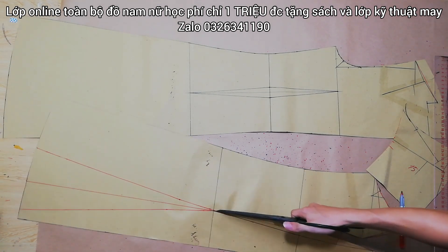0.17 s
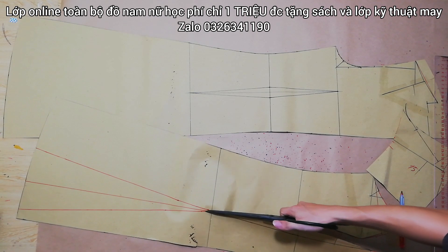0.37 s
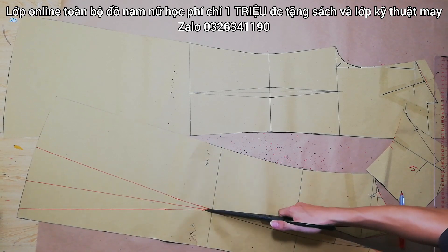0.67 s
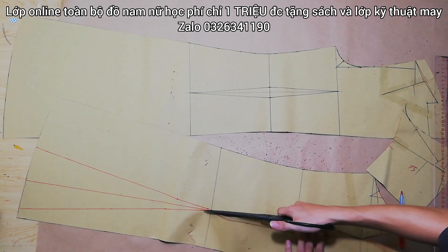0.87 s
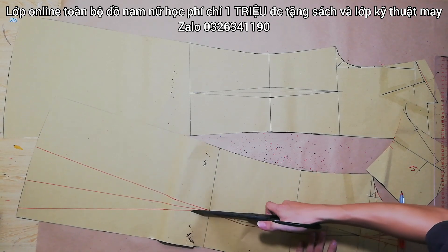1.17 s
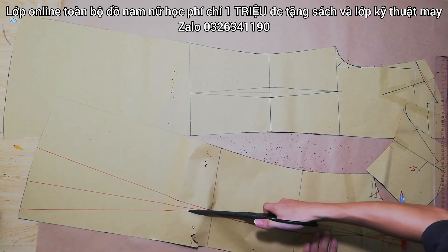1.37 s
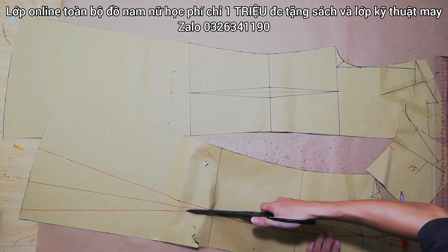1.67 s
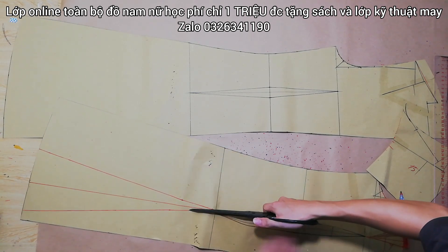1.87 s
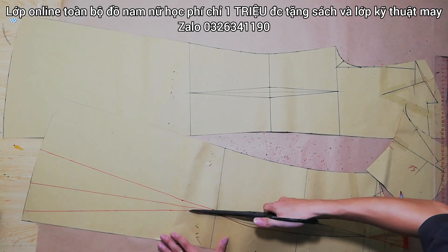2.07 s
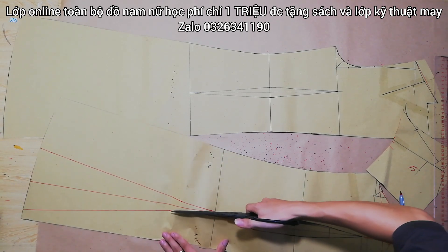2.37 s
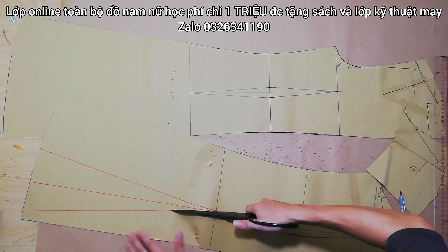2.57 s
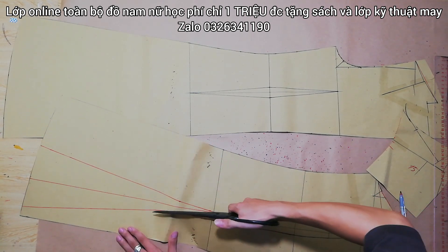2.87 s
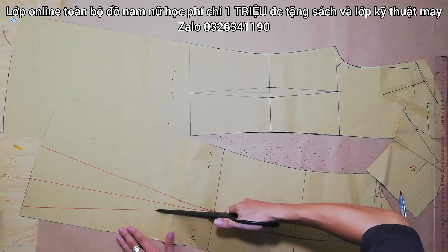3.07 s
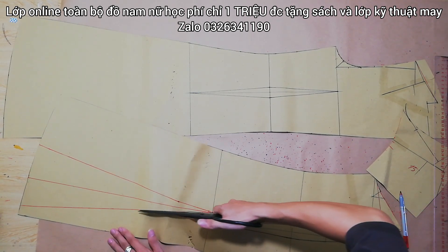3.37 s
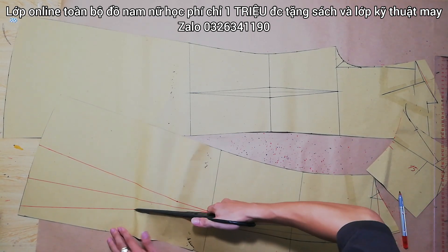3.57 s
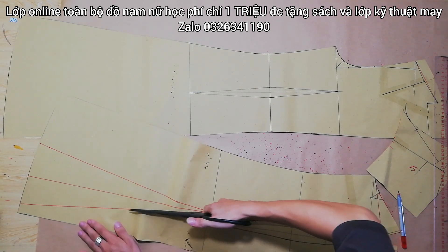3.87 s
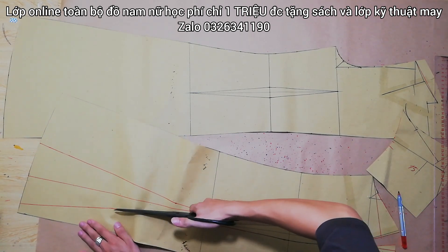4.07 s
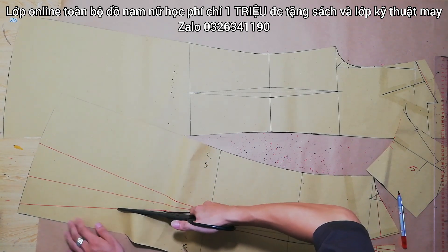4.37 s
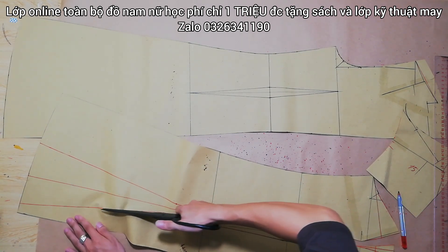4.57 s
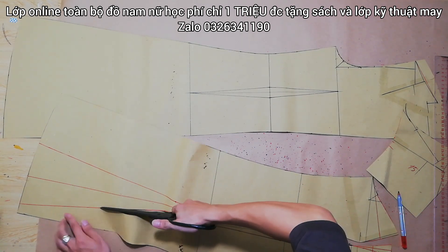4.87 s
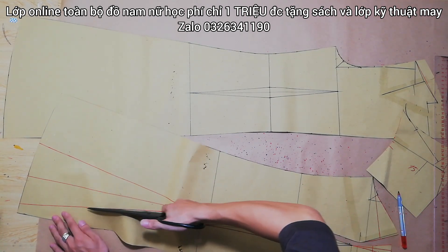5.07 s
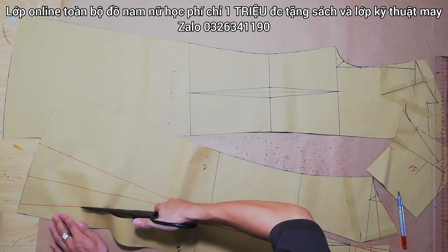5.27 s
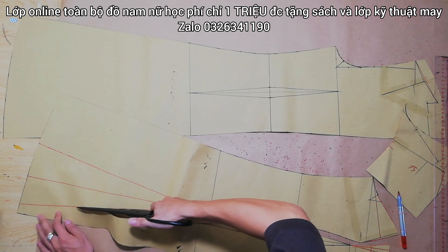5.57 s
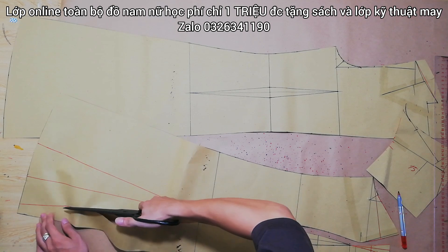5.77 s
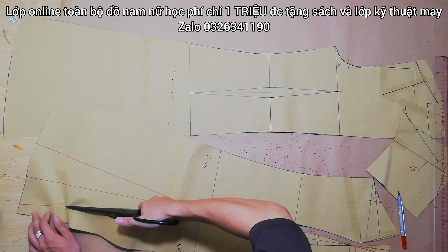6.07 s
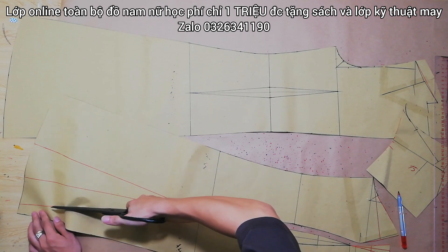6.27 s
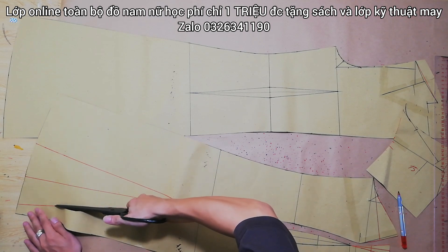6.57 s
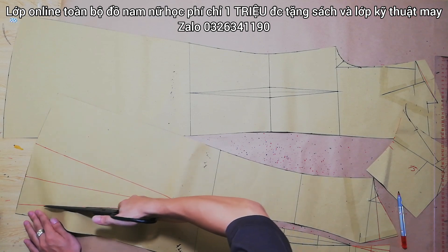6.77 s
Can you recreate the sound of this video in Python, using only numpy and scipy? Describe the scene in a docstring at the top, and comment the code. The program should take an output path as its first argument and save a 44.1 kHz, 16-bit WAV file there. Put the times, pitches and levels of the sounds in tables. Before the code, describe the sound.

Close, wide stereo in a bare room with a short echo and a low murmur. From 0 s the open shears hiss lightly along stiff paper, with small ticks and faint low tones. The first crunch comes at 0.6 s, dense with tiny fibre cracks over a woody table judder. Around 0.9-1.1 s the blades scrape strongly and the sheet rasps, ending in a very loud dry snap at 1.07 s, then a fading slide and a soft low tone near 1.45 s. Further crunches fall at 1.7, 2.5, 3.05, 3.6, 4.2, 4.8, 5.35, 5.9 and 6.5 s, each about a tenth of a second. Between them steel wipes open, friction hisses swell, paper snaps, and the hand drags and bumps softly on the table. Blade taps mark 5.03, 5.35 and 6.49 s; the last cut is weaker with more steel ring, then a faint slide to the end.

```python
"""Shears cutting stiff paper

Large tailor's shears make ten cuts through stiff pattern paper on a wooden work table, in a bare room.
Each cut is a short crunch of tiny random fibre cracks; the lower blade judders on the ringing table top.
Between cuts the shears open and slide on: noisy friction hisses along the sheet and makes it resonate.
Sharp pulses make paper snaps and blade ticks; soft drags, bumps, low tones and room murmur lie below."""
import sys
import numpy as np
from scipy import signal
from scipy.fft import rfft, irfft, next_fast_len
from scipy.io import wavfile
from scipy.ndimage import map_coordinates

SR = 44100
rng = np.random.default_rng(int(sys.argv[2]) if len(sys.argv) > 2 else 0)


def master(y):
    """Save y as 16-bit WAV."""
    cut = np.clip(np.atleast_2d(y).T, -1, 1)
    pcm = np.round(cut * 32767)  # scale
    wavfile.write(sys.argv[1], SR, pcm.astype(np.int16))


N = 305613
TIME = np.arange(N) / SR  # s

# the ten cuts, with the strength of each part before its layer is trimmed and shaped:
# start t/s, hardest bite t/s, blades shut t/s, crunch level/dB, fibre fizz level/dB,
# change of level when shut/dB, table knock level/dB, table boom level/dB, deep thud level/dB,
# blade ring level/dB, drag after the cut level/dB
CUTS = [(0.578, 0.595, 0.67, -35.5, -35.5, -8, -38.5, -42.5, -44.5, -50, -57),
        (1.71, 1.738, 1.8, -30, -34.5, -14.5, -39.5, -38, -47.5, -61, -75),
        (2.496, 2.532, 2.593, -32, -37, -13, -39.5, -43, -44.5, -54, -51),
        (3.052, 3.075, 3.166, -30.5, -34, -16, -41, -41.5, -41.5, -55, -50),
        (3.623, 3.65, 3.75, -32.5, -35.5, -10.5, -39.5, -40, -49.5, -54, -55),
        (4.217, 4.25, 4.322, -34.5, -35.5, -7, -37, -40, -43, -60, -53),
        (4.81, 4.819, 4.905, -32.5, -32, -11.5, -40, -40.5, -46.5, -47, -53),
        (5.341, 5.377, 5.455, -35.5, -36.5, -13, -38.5, -35.5, -43, -44, -54.5),
        (5.911, 5.932, 6.03, -34, -33.5, -8, -40.5, -39, -53, -49, -64),
        (6.506, 6.518, 6.58, -41.5, -42, -4, -37.5, -38, -51, -39.5, -67)]
# ways the table top rings: f/Hz, width f/Hz, relative level/dB
TABLE_MODES = [(88.2, 13.6, 4), (131.6, 32, -3), (145.7, 29, -0.5), (221.4, 12.4, 3), (237, 22, -4.5),
               (286.6, 11, -0.5), (329.6, 23, -4), (405.6, 23.6, -3), (468.6, 29, -2), (538, 19.4, -3),
               (599, 24, -2), (746.7, 31, -1), (784, 56, -1), (879, 45, -2.5), (1022, 43, -8.5),
               (1140, 51, -11), (1240, 53, -18), (1477, 51, -14.5)]
# tone colour of snaps and snagging fibres: f/Hz, relative level/dB per Hz
SNAP_COLOUR = [(300, -25), (900, -12), (1600, -8.5), (3000, -4.5), (5000, -1), (7500, -0.5), (11500, -6.5),
               (14000, -27), (16000, -15)]


def amp(db):
    """Turn decibels into a plain gain."""
    return 10 ** (np.asarray(db) / 20)


def unit(x):
    """Scale to an rms (average strength) of 1."""
    return x / np.sqrt(np.mean(x ** 2) + 1e-20)


def along(points, hz):
    """Read a curve of (f/Hz, value) points, spaced by musical interval."""
    f, value = np.transpose(points)
    return np.interp(np.log(hz + 1), np.log(f), value)


def wobble(rate):
    """A smooth random curve with this many knots a second."""
    coarse = TIME[::32]
    knots = rng.standard_normal(N // 64)
    return np.interp(TIME, coarse, map_coordinates(knots, [coarse * rate], mode="wrap"))


def filtered(x, response):
    """Change the strength and phase of each frequency in x by the given response."""
    m = next_fast_len(N + SR)
    return irfft(rfft(x, m) * response(np.fft.rfftfreq(m, 1 / SR)), m)[..., :N]


def colour(points):
    """A filter that follows (f/Hz, level/dB) points, never sounds early and has power 1."""
    def response(hz):
        cepstrum = irfft(np.log(unit(amp(along(points, hz)))))
        half = len(cepstrum) // 2
        # folding the cepstrum onto its first half puts the response after its cause
        folded = np.r_[cepstrum[0], 2 * cepstrum[1:half], np.zeros(half)]
        return np.exp(rfft(folded))
    return response


def spread(pair):
    """Mix two unrelated signals into left and right: alike in the bass, nearly unrelated in the top treble."""
    # likeness of the two sides (1 same, 0 unrelated, -1 opposite): f/Hz, likeness
    likeness = [(100, 0.98), (200, 0.44), (330, 0.42), (650, -0.4), (1300, 0.54), (2500, -0.072),
                (12000, -0.0076)]

    def shares(hz):
        turn = np.arccos(np.clip(along(likeness, hz), -1, 1)) / 2
        return np.array([np.cos(turn), np.sin(turn)])
    mid, side = filtered(pair, shares)
    return np.array([mid + side, mid - side])


def crackle(rate, scatter_db):
    """Tiny slips at random times, about rate a second, of uneven size; rms 1."""
    hit = rng.random(N) < rate / SR
    size, sign = rng.standard_normal((N // 2, 2))[:hit.sum()].T
    slips = np.zeros(N)
    slips[hit] = amp(scatter_db * np.clip(size, -2, 2)) * np.sign(sign)
    return unit(slips)


def wide_crackle(rate, scatter_db):
    """Two unrelated crackles, for a large surface that radiates from many places."""
    return np.array([crackle(rate, scatter_db), crackle(rate, scatter_db)])


def stroke(times, levels_db):
    """Gain that runs through (t/s, level/dB) corners and is silent outside them."""
    times = np.maximum.accumulate(times)
    inside = slice(*np.searchsorted(TIME, [times[0], times[-1]]))
    gain = np.zeros(N)
    gain[inside] = amp(np.interp(TIME[inside], times, levels_db))
    return gain


def ringing(modes, hz):
    """Add resonances of (f/Hz, width f/Hz, level/dB) that ring only after they are driven."""
    total = 0
    for k, (centre, width, db) in enumerate(modes):
        damping = 1j * hz * width
        resonance = damping / (centre * centre - hz * hz + damping)
        total = total + amp(db) * resonance * (-1) ** k  # every other mode moves the opposite way
    return total


def struck(force, modes, lo_hz, hi_hz):
    """A body rings under a force; the kind of contact favours its modes between lo_hz and hi_hz."""
    def response(hz):
        low_pass = 1 + (hz / hi_hz) ** 6
        high_pass = 1 + (lo_hz / (hz + 1)) ** 6
        h = ringing(modes, hz) / low_pass / high_pass
        return h / np.sqrt(np.mean(np.abs(h) ** 2))
    return filtered(force, response)


def room(x, near_t60, wet_db, size=8192):
    """A quick scatter off sheet and table, then the walls; the paths change as the shears travel."""
    # time for the walls' echo to fall 60 dB: f/Hz, t/s
    wall_t60 = [(100, 0.47), (400, 0.76), (1000, 0.45), (3000, 0.45), (8000, 0.47), (15000, 0.48)]
    t = np.arange(2 * size) / SR
    norm = lambda h: h / np.linalg.norm(h, axis=-1, keepdims=True)
    hz, age, z = signal.stft(rng.standard_normal((2, len(t))), SR, nperseg=256)
    fade = amp(-60 * age / along(wall_t60, hz)[:, None])
    tail = signal.istft(z * fade, SR, nperseg=256)[1]
    walls = amp(wet_db) * norm(tail * (1 - np.exp(-t / 0.0042)))  # echoes build up over milliseconds
    scatter = amp(-60 * t / near_t60)
    out = np.zeros((2, N + 3 * size))
    for i in range(0, N, size):  # each block of sound gets new random nearby paths
        paths = norm(rng.standard_normal((2, len(t))) * scatter) + walls
        block = np.pad(x, (0, size))[None, i:i + size]
        out[:, i:i + 3 * size - 1] += signal.fftconvolve(block, paths, axes=1)
    return spread(out[:, :N])


def room_tone():
    """The steady low murmur and hiss of the room: random noise with a fixed tone colour."""
    # tone colour of the room: f/Hz, relative level/dB per Hz
    murmur = [(20, -30), (50, 7.5), (95, -19), (140, -18.5), (215, -6.5), (400, -13.5), (700, -17.5),
              (1500, -14), (4000, -16), (11500, -27.5), (16000, -32)]
    noise = rng.standard_normal((2, N))
    return amp(-60) * spread(filtered(noise, colour(murmur)))


def hum():
    """Soft low tones, each a gliding sine with a weak octave, swell, flutter and fade."""
    # the tones: start t/s, loudest t/s, end t/s, pitch when loudest f/Hz, glide/(Hz per s), level/dB
    hums = [(0.0, 0.172, 0.34, 209, -62, -59.5), (0.231, 0.346, 0.43, 186, -69, -49.5),
            (0.388, 0.5, 0.65, 177.5, -59.5, -56), (1.284, 1.448, 1.66, 223, 15.5, -52)]
    swell_db = 16.5
    tone = np.zeros(N)
    for start, loudest, end, hz, glide, db in hums:
        phase = 2 * np.pi * np.cumsum(hz + glide * (TIME - loudest)) / SR
        gain = stroke([start, loudest, end], [db - swell_db, db, db - swell_db])
        tone += gain * (np.sin(phase) + amp(-25.0) * np.sin(2 * phase))
    return tone * amp(1.1 * wobble(24.8))


def handling():
    """Hand and handle drag over the table after each cut and nudge it; the blade tip taps it."""
    # soft bumps of the handle on the table: t/s, level/dB
    bumps = [(0.96, -56), (2.189, -50.5), (2.488, -44), (2.74, -57), (2.869, -56), (3.269, -51),
             (3.369, -50.5), (4.482, -56), (4.544, -44), (4.797, -47.5), (5.753, -54), (6.088, -55)]
    # taps of the lower blade on the table: t/s, level/dB
    blade_taps = [(0.114, -49), (2.487, -45.5), (4.797, -51), (5.025, -43), (5.299, -61), (5.349, -35),
                  (6.488, -37)]
    rise_s, lag_s, fade_db_per_s = 0.08, 0.051, 65
    pull = amp(-64.5)  # the resting hand
    for _, _, shut, *_, drag_db in CUTS:
        s = shut + lag_s
        pull = pull + amp(drag_db) * stroke([s - rise_s, s, s + 1], [-12, 0, -fade_db_per_s])
    drag = pull * crackle(rate=600, scatter_db=6.5)
    nudges = sum(amp(db) * stroke([s - .008, s, s + 0.022], [-15, 5, -12]) for s, db in bumps)
    taps = sum(amp(db) * stroke([s - .001, s, s + 0.0028], [-15, 6, -15]) for s, db in blade_taps)
    nudges = nudges * crackle(rate=900, scatter_db=0)
    taps = taps * crackle(rate=5000, scatter_db=0.0)
    soft = struck(drag, TABLE_MODES, lo_hz=54, hi_hz=248)
    soft = soft + struck(nudges, TABLE_MODES, lo_hz=50, hi_hz=223)
    ticks = struck(taps, TABLE_MODES, lo_hz=372, hi_hz=3000)
    return soft + room(ticks, near_t60=0.0076, wet_db=-3)


def snaps():
    """The stiff sheet buckles or the blades tick: a sharp pulse, a short splinter of cracks, their scatter."""
    # paper snaps and blade ticks, before a shared boost: t/s, level/dB
    snap_list = [(0.138, -31), (0.3647, -24), (0.804, -28), (0.9504, -36), (1.0727, -4), (1.736, -22),
                 (2.142, -35), (2.238, -23.5), (2.327, -24.5), (2.37, -26.5), (2.5057, -34), (2.7444, -27),
                 (2.9102, -24), (4.013, -34), (4.225, -23), (5.2972, -18), (5.447, -21), (6.416, -26),
                 (6.569, -19.5)]
    pulses = np.zeros(N)
    for s, db in snap_list:
        pulses[round((s + .001) * SR)] = amp(db + 1)
    length = SR // 200  # 5 ms
    splinter = rng.standard_normal(length) * np.linspace(1, 0, length)
    cracks = amp(-21.0) * signal.lfilter(splinter, 1, pulses)
    crack = filtered(pulses + cracks, colour(SNAP_COLOUR))
    return crack + amp(-4.5) * room(crack, near_t60=0.02, wet_db=2)


def friction():
    """Strength of the hiss and, for each push or catch, the strength and pitch of the rub."""
    # the blades spring open, steel wiping steel: t/s, hiss level/dB
    openings = [(0.0, -45.5), (0.807, -44), (1.08, -37.5), (2.144, -46), (2.745, -49), (3.278, -52.5),
                (3.897, -47.5), (4.438, -46), (4.985, -45.5), (5.598, -44.5), (6.2, -45.5), (6.748, -53)]
    # the sheet catches on the blade and jerks free with a short rasp:
    # t/s, length t/s, rub level/dB, pitch f/Hz
    catches = [(0.117, 0.12, -51.5, 1450), (0.951, 0.08, -36.5, 2300), (2.144, 0.053, -45.5, 2750),
               (2.168, 0.081, -46, 2502), (2.871, 0.07, -50, 2920), (2.91, 0.04, -49, 3000),
               (2.977, 0.089, -45.5, 2500), (4.759, 0.055, -44.5, 1950), (5.3, 0.03, -39, 1700)]
    # pushes of the open shears along the cut: start t/s, fastest t/s, end t/s, swell/dB,
    # hiss of steel on paper level/dB, rub of the sheet level/dB, pitch of the rub f/Hz
    pushes = [(0.0, 0.25, 0.48, 5.5, -48.5, -54, 2940), (0.852, 0.895, 1.013, 8, -35, -37.5, 2470),
              (1.01, 1.058, 1.474, 17.5, -40, -45, 2700), (1.569, 1.62, 1.67, 1, -52, -55.5, 1900),
              (2.184, 2.296, 2.44, 4, -45.5, -49.5, 2330), (2.78, 2.935, 2.99, 8, -45, -54, 2740),
              (3.32, 3.544, 3.61, 12.5, -46, -47, 2900), (3.92, 4.036, 4.19, 11.5, -40.5, -45.5, 3030),
              (4.548, 4.719, 4.8, 12, -41.5, -49.5, 2400), (5.08, 5.163, 5.28, 4.5, -48, -58, 2950),
              (5.651, 5.793, 5.89, 7.5, -40.5, -51, 3260), (6.224, 6.295, 6.32, 8, -38, -45.5, 2700),
              (6.418, 6.47, 6.485, 0.5, -51, -53.5, 2420), (6.77, 6.85, 7.1, 6, -57, -67, 3000)]
    open_attack_s, open_fade_db_per_s, catch_attack_s = 0.014, 126, 0.009
    push_attack_s, push_release_s = 0.049, 0.049
    edge_db = -12.5  # a push fades in from, and out to, this far under its ends
    end_swell, rub_grows = 0.96, 1.21  # share of swell lost by the end; the rub swells wider than the hiss

    hiss = 0
    for s, db in openings:
        hiss = hiss + amp(db) * stroke([s - open_attack_s, s, s + .5], [-20, 0, -open_fade_db_per_s / 2])
    rubs = []
    for s, length, db, hz in catches:
        rubs.append((amp(db) * stroke([s - catch_attack_s, s, s + length], [-20, 0, -30]), hz))
    for start, fastest, end, swell_db, steel_db, sheet_db, pitch_hz in pushes:
        corners = [start - push_attack_s, start, fastest, end, end + push_release_s]
        end_db = -end_swell * swell_db
        speed_db = np.array([edge_db - swell_db, -swell_db, 0, end_db, edge_db + end_db])
        hiss = np.hypot(hiss, stroke(corners, steel_db + speed_db))
        rubs.append((stroke(corners, sheet_db + rub_grows * speed_db), pitch_hz))
    resting_hiss = amp(-62.5)  # the blades never quite leave the paper
    return np.hypot(hiss, resting_hiss), rubs


def sliding():
    """The open blades rub along the cut edges; the sheet's resonance differs as it lifts and settles."""
    # tone colour of the steel hiss: f/Hz, relative level/dB per Hz
    hiss_colour = [(1500, -27.5), (3300, -4.5), (4800, -3), (7500, -2.5), (10000, -2.5), (11700, -6.5),
                   (13200, -14), (16000, -22)]
    # tone colour of the rubbing sheet: f/Hz, relative level/dB per Hz
    rub_colour = [(150, -14), (500, -14), (900, -9.5), (1300, -6), (2000, -1.5), (3100, -1.5), (4000, -3.5),
                  (7000, -19)]
    hiss, rubs = friction()
    grip = amp(1.58 * wobble(55))  # friction sticks and slips
    sheet_grip = grip * amp(1.85 * wobble(35))
    rub = sheet_grip * sum(gain for gain, _ in rubs)
    steel = filtered(hiss * grip * wide_crackle(rate=7000, scatter_db=0.5), colour(hiss_colour))
    sheet = filtered(rub * wide_crackle(rate=3500, scatter_db=2), colour(rub_colour))
    slips = sheet_grip * wide_crackle(rate=2500, scatter_db=4.0) * amp(-1)
    octaves = 0.22  # how far from its own pitch a resonance still answers
    for hz in (1450, 2050, 3000):  # the resonance nearest to the pitch of the rub speaks most
        drive = 0
        for gain, pitch in rubs:
            distance = np.log2(pitch / hz) / octaves
            drive = drive + gain * np.exp(-distance ** 2 / 2)
        sheet += struck(slips * drive, [(hz, hz * 0.34, 0)], lo_hz=950, hi_hz=4030)
    stray_fibres = hiss * amp(-18.5) * crackle(rate=22, scatter_db=3.5)
    snags = filtered(stray_fibres, colour(SNAP_COLOUR))  # they catch on the edge
    rasp = spread(steel + sheet) + snags
    return rasp + amp(-8.0) * room(rasp[0], near_t60=0.07, wet_db=1.0)


def judder():
    """The lower blade chatters on the table; the boom grows as the hand presses the shears shut."""
    knock, boom, thud = np.zeros((3, N))
    for start, bite, shut, _, _, _, hard_db, soft_db, deep_db, _, _ in CUTS:
        corners = [start - .008, start + 0.0045, bite + 0.012, shut - .015, shut + 0.027, shut + 0.14]
        knock += amp(hard_db - .5) * stroke(corners, [-6.5, -3, 0.5, -3.0, -13.5, -31.5])
        corners = [start - .01, start + 0.0037, bite, shut - .025, shut, shut + 0.033, shut + 0.19]
        press = stroke(corners, [-4, -12.0, -5.5, 3, -2, -11.0, -23.5])
        boom += press * amp(soft_db - 2.0)
        thud += press * amp(deep_db - 2)
    chatter = knock * wide_crackle(rate=900, scatter_db=6.0)
    knocks = spread(struck(chatter, TABLE_MODES, lo_hz=324, hi_hz=1820))
    booms = struck(boom * crackle(rate=700, scatter_db=-0.5), TABLE_MODES, lo_hz=118, hi_hz=340)
    thuds = struck(thud * crackle(rate=700, scatter_db=7.0), TABLE_MODES, lo_hz=54, hi_hz=137)
    echo = room(knocks[0] + booms / 2, near_t60=0.078, wet_db=1)
    return knocks + booms + thuds + amp(-7) * echo


def cutting():
    """Fibres part in a dense crackle that swells as the blades bite; the grinding edges ring the steel."""
    # tone colour of the crunching sheet: f/Hz, relative level/dB per Hz
    crunch_colour = [(200, -19), (500, -8.5), (900, -7.5), (1500, -3), (2200, -1.5), (2700, 2.5), (3300, 2),
                     (4000, -7), (6000, -11.5), (12000, -20)]
    # tone colour of the fizzing fibres: f/Hz, relative level/dB per Hz
    fizz_colour = [(1500, -29), (3500, -1.5), (5000, -0.5), (7500, -2), (10000, -2), (12000, -8.5),
                   (13500, -19), (16000, -53)]
    # ways the steel blade rings: f/Hz, width f/Hz, relative level/dB
    blade_modes = [(2560, 33, -9.5), (3140, 77, -15), (3262, 58, 4), (3340, 63, -1), (6650, 200, -12)]
    entry_db, swell_s, release_s = -9, 0.012, 0.049
    crunch, fizz, grind = np.zeros((3, N))
    for start, bite, shut, low_db, high_db, shut_db, _, _, _, steel_db, _ in CUTS:
        # the edges touch, press in, bite through, run out to the tips and stop
        corners = [start - .006, start + 0.006, bite - swell_s, bite - .005,
                   bite + 0.011, bite + 0.028, shut - .008, shut + release_s]
        effort = stroke(corners, [-26, entry_db, entry_db + 3.5, 0, 0, shut_db * 0.67, shut_db, -40])
        crunch += effort * amp(low_db)
        fizz += effort * amp(high_db)
        grind_corners = [start, bite, shut - .008, shut + release_s]
        grind += amp(steel_db) * stroke(grind_corners, [-20, 1.5, -14.5, -42])
    catch = amp(1.96 * wobble(170))  # the edges catch and let go
    sheet = filtered(crunch * catch * wide_crackle(rate=2200, scatter_db=3.0), colour(crunch_colour))
    fibres = filtered(fizz * catch * wide_crackle(rate=6000, scatter_db=-1.0), colour(fizz_colour))
    scrape = grind * wide_crackle(rate=900, scatter_db=5.5)
    steel = struck(scrape, blade_modes, lo_hz=1500, hi_hz=8000)
    snip = spread(sheet + fibres + steel)
    return amp(-1.0) * snip + amp(-4.5) * room(snip[0], near_t60=0.043, wet_db=0.5)


def scene():
    """Add all the layers, from the background to the cuts."""
    background = room_tone() + hum() + handling()
    return background + snaps() + sliding() + judder() + cutting()


def record(dry):
    """The two microphone ports differ in colour; nothing is kept from 15800 Hz upwards."""
    # how much louder the left port is than the right: f/Hz, left minus right level/dB
    lean = [(150, 0.9), (300, -0.5), (600, 1.5), (1300, 0), (2200, 1), (3100, 1.5), (4400, 0.5), (8000, 3),
            (11000, -8.5), (15000, -3.5)]

    def ports(hz):
        half_each = np.array([[.5], [-.5]])
        return amp(half_each * along(lean, hz)) * (hz < 15800)
    return filtered(dry, ports)


dry = scene()
out = record(dry)
master(out)
```